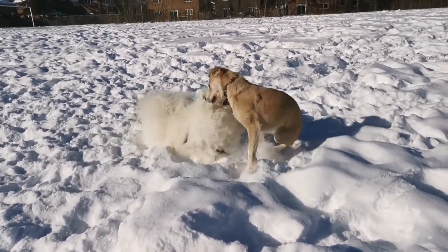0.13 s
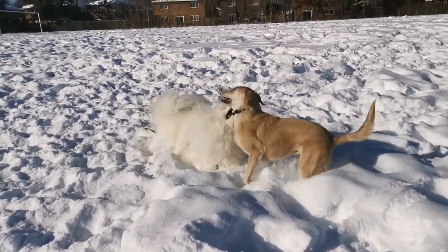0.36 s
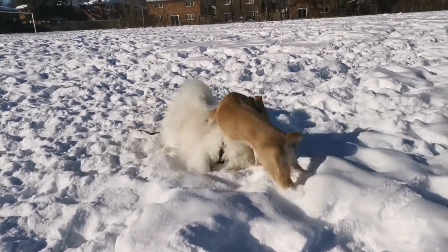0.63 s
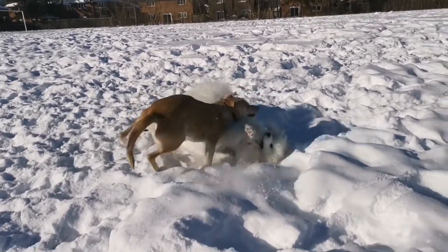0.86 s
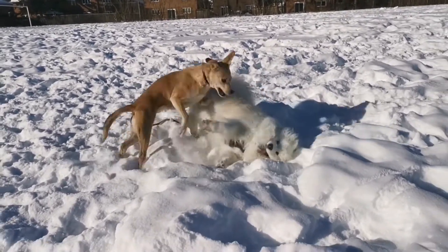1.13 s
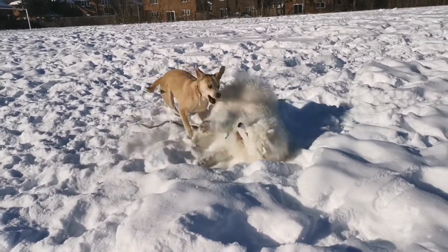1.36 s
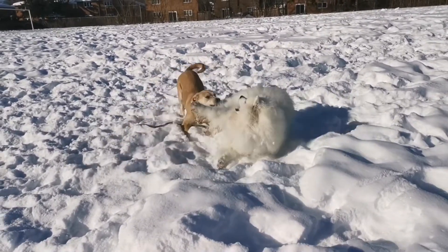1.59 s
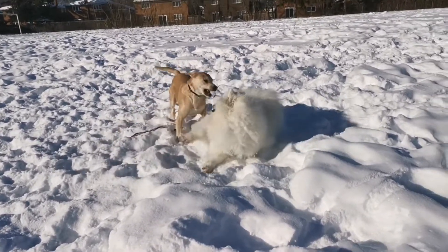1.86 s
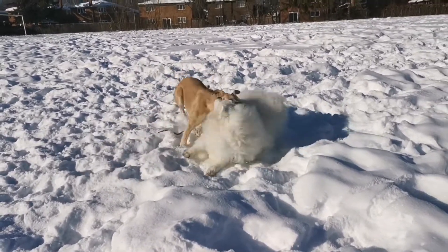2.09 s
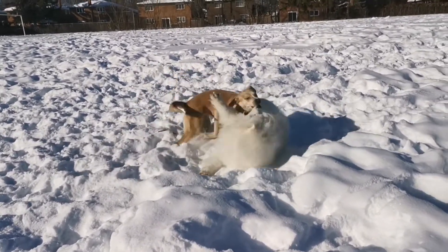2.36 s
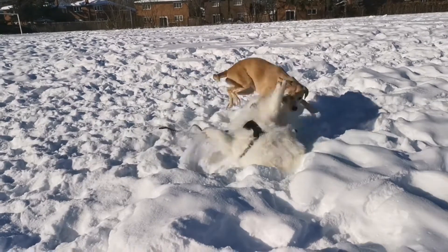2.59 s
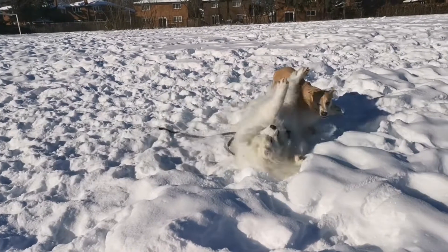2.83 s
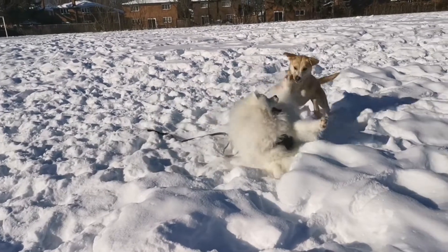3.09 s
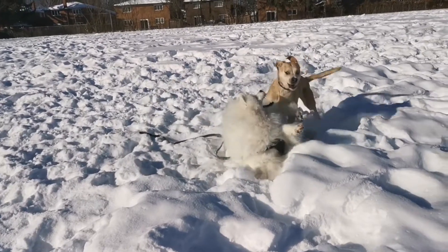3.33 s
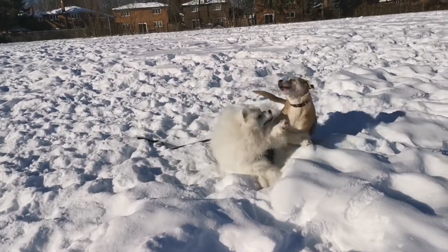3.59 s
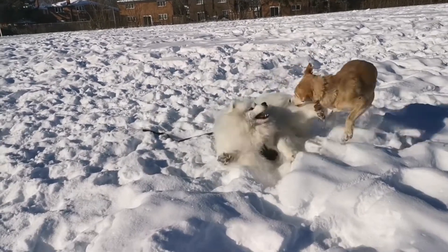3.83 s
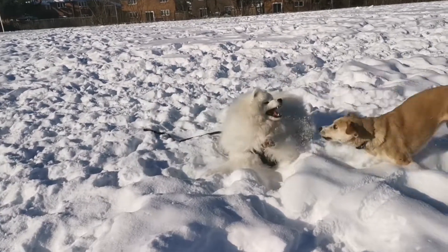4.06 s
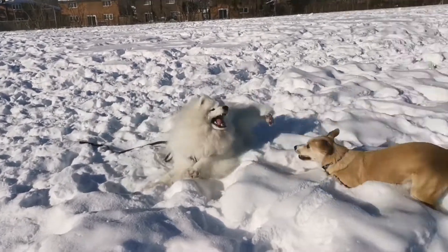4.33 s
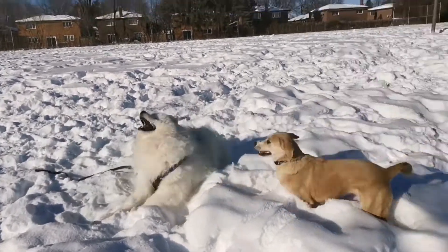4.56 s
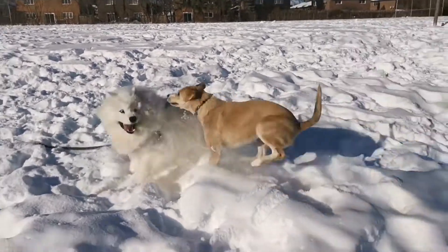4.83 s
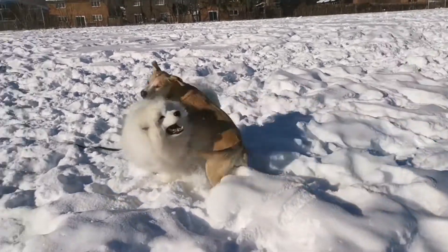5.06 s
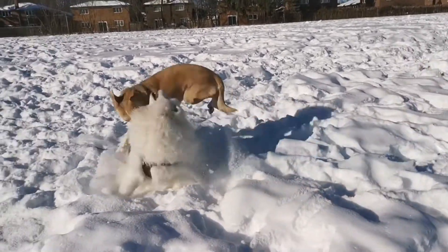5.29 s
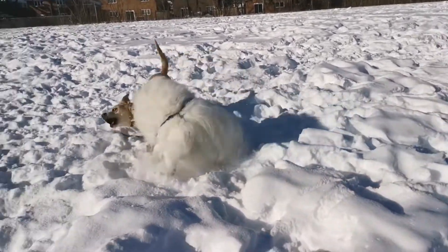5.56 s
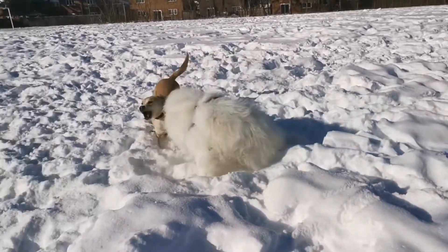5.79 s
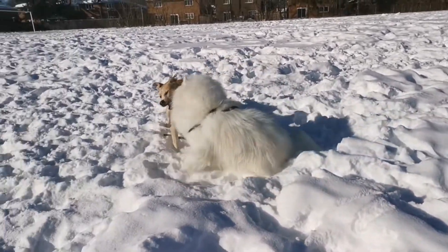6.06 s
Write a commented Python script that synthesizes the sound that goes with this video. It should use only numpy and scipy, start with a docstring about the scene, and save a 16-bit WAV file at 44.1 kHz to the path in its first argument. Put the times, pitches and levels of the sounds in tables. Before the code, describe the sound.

Outdoors on a snowy field, a small stereo microphone a few metres away catches dogs wrestling over a very faint, low rumbling breeze. From 0 to 1.2 s snow crunches and is shoved in dull lumps, with paw thumps at 0.3, 0.7 to 0.8 and 1.1 s, a tiny whine at 0.7 s and two quick pants around 1 s, then a faint breathy squeak. A low, throaty growl runs 1.3 to 1.8 s, briefly choked. After a lull, a stronger growl at 2.2 to 3.0 s rises, drops and throbs amid crunches and bright snaps. Soft pants follow. The third growl, 3.5 to 4.3 s, is forceful and jolting, with a sharp snap at 3.8 s and heavy crunching. Thuds cluster at 4.4 to 5.1 s between pants. A final raspy growl, 5.4 to 6.0 s, breaks into deep flutter, ending with a mouth-opening breath and a small crunch.

```python
"""Snow crunches and thumps under a light, rumbling breeze as two dogs wrestle and pant, with four growls
in between. Growls: uneven fold pulses and turbulent air ring chest, throat and mouth. Whine: a wavering sine.
Snow: clumped ice grains, dull clods and damped knocks. Breaths: noise through open-mouth resonances.
Breeze and air: lumpy filtered noise. A small stereo microphone a few metres off colours each port."""
import sys
import numpy as np
from scipy import signal
from scipy.fft import rfft, irfft
from scipy.io import wavfile
from scipy.ndimage import uniform_filter1d

SR = 44100
rng = np.random.default_rng(int(sys.argv[2]) if len(sys.argv) > 2 else 0)


def materialize(psi):
    """Save the field psi as 16-bit PCM at rate SR to the path in sys.argv[1].

    A 1-D psi becomes a single channel; in a 2-D psi each row is a channel.
    """
    bounded = np.clip(np.atleast_2d(psi).T, -1, 1)
    quanta = np.round(bounded * 32767).astype(np.int16)
    wavfile.write(sys.argv[1], SR, quanta)


def voltage_ratio(level):
    """Linear amplitude factor for a level in decibels (scalar or array-like)."""
    return 10 ** (np.asarray(level, float) / 20)


N = 272097  # samples

# air of the field, spectrum shape: hz, density_db_per_hz
AIR_SPECTRUM = [(12, -40), (20, 2), (66, -5), (165, -10), (250, -11.5), (412, -21), (1060, -21.5),
                (15200, -55)]
AIR_DB, BREEZE_DB = -59, -61.5

# fur and bodies shoving in the snow: peak_s, peak_db, build_up_s, dying_s
SCUFFLES = [(.626, -45, 0.38, 0.014), (.702, -60.5, .035, 0.74), (1.11, -48, 0.31, 0.046),
            (3.4, -56, 0.24, 0.035), (4.46, -45, 0.21, 0.33), (4.716, -42, 0.36, 0.0092),
            (5.036, -52.5, 0.18, 0.021), (5.3, -55, 1, 0.87)]
# packed snow under bodies, spectrum shape: hz, density_db_per_hz
BODY_SPECTRUM = [(40, -42), (70, 7.5), (250, 0.5), (700, -3.5), (1100, -13.5), (3500, -43)]
# paws and bodies crushing the snow: peak_s, peak_db (before crunch trim), build_up_s, dying_s
CRUNCHES = [(.1, -55, 0.043, 0.54), (.27, -48, 0.03, 0.07), (.33, -45, 0.07, 0.16),
            (.55, -40.5, 0.18, 0.095), (.76, -53, 0.15, 0.073), (.9, -52, 0.1, 0.17),
            (1.0, -51.5, 0.13, 0.26), (1.22, -55.5, 0.04, 0.067), (1.48, -41, 0.076, 0.063),
            (2.34, -39.5, 0.092, 0.29), (2.49, -42, 0.1, 0.08), (2.71, -42, 0.024, 0.16),
            (2.86, -46.5, 0.064, 0.16), (2.94, -42.5, 0.078, 0.2), (3.02, -44, 0.19, 0.025),
            (3.38, -58, 0.34, 0.079), (3.54, -53, 0.17, 0.26), (3.66, -40.5, 0.2, 0.058),
            (3.8, -39.5, 0.14, 0.073), (3.9, -45, 0.02, 0.037), (3.99, -44, 0.041, 0.15),
            (4.14, -37, 0.049, 0.35), (4.31, -46, 0.45, 0.076), (4.55, -46.5, 0.18, 0.66),
            (4.69, -52.5, 0.26, 0.14), (4.81, -55, 0.038, 0.032), (5.02, -43.5, 0.13, 0.032),
            (6.14, -46.5, 0.02, 0.038)]
# faint hiss of snow between crunches: s, level_db (before crunch trim)
SIFT_LEVEL = [(0.0, -53), (.22, -60), (.7, -58.5), (1.4, -60.5), (2.18, -70), (3.44, -78.5), (5.0, -59),
              (5.1, -56), (5.81, -54.5), (6.17, -67)]
# crushed snow, spectrum shape: hz, density_db_per_hz
SNOW_SPECTRUM = [(200, -2), (2500, -9), (4300, -11.5), (4900, -9.5), (7200, -8), (10000, -27), (15200, -36)]
BURST_SPAN_DB = 20  # fall from the peak over one build_up_s or dying_s
# paws landing: start_s, level_db, pitch_hz
THUMPS = [(0.257, -37, 305), (0.702, -37, 530), (0.752, -39.5, 150), (0.822, -39, 338), (1.075, -37.5, 166),
          (1.109, -37, 182), (4.369, -32, 279), (4.419, -29, 363), (4.426, -29, 218), (4.596, -31, 248),
          (4.657, -32, 275), (4.707, -31, 252), (5.005, -34.5, 585), (5.019, -29, 485), (5.108, -42.5, 705)]
# crust snapping and teeth clacking: start_s, level_db, pitch_hz
SNAPS = [(.2874, -38.5, 6700), (.9815, -38, 4420), (2.49, -31.5, 6630), (2.572, -33, 7040),
         (3.788, -25.5, 2460), (3.794, -30, 2880), (3.804, -33.5, 5430), (3.895, -43.5, 6000),
         (4.805, -37, 7200), (.54, -38, 5530), (6.132, -51, 3970)]

# panting, a breathy squeak (1.195) and the mouth opening as the last growl ends (5.896):
# start_s, end_s, level_db, resonance_factor, resonance_glide_share, width_factor
BREATHS = [(0.964, 1.055, -54, 0.85, -0.055, 1.3), (1.073, 1.169, -52.5, 0.93, 0.077, 2.2),
           (1.195, 1.247, -61, 1.96, -0.09, 2), (3.083, 3.224, -59, 0.57, 0.27, 1.14),
           (3.328, 3.406, -54, 0.89, 0.089, 2), (4.577, 4.638, -51.5, 0.71, .05, 1.8),
           (4.852, 4.996, -50.5, 0.874, 0.061, 0.83), (5.213, 5.27, -58.5, 1.18, -.03, 1.5),
           (5.298, 5.424, -51.5, 0.79, 0.11, 1.6), (5.896, 5.938, -49.5, 1.12, 0.0017, 0.58)]
# open mouth, before the factors of each breath: resonance_hz, width_hz, relative_db
OPEN_MOUTH = [(1050, 270, -1), (1950, 200, 4), (2740, 320, 1), (3400, 450, -2), (4280, 230, -10)]
# faint whine: s, pitch_hz, mean_level_db
WHINE = [(.7, 534, -50), (.76, 620, -61), (.82, 656, -53.5), (.88, 590, -69)]

# one table a growl: s, fold_pitch_hz, effort_db, mouth_resonance_hz, upper_over_throat_db
GROWLS = [
    [(1.334, 62.6, -56, 905, 11), (1.36, 63.98, -46, 890, -6), (1.47, 81.7, -38, 765, -7.5),
     (1.54, 90.7, -38.5, 734, -13.5), (1.59, 124.9, -41.5, 636, -8.5), (1.654, 124.7, -39.5, 468, -12.5),
     (1.748, 85.5, -59.5, 775, 6.5), (1.82, 80.8, -78, 720, 4)],
    [(2.228, 85, -43, 633, -21), (2.236, 89.92, -34.5, 660, -21), (2.326, 126.3, -31, 738, -9.5),
     (2.384, 117.5, -35.5, 640, -12), (2.466, 165, -24.5, 590, -12), (2.542, 205.6, -24.5, 543, -12),
     (2.59, 131.9, -34.5, 505, -12), (2.664, 119.1, -42, 524, -18.5), (2.78, 136.1, -38, 516, -11.5),
     (2.87, 133.6, -34, 765, -5.5), (2.938, 111.2, -40, 615, 2.5), (3.0, 91, -78, 705, -8)],
    [(3.462, 77.55, -45.5, 550, -3), (3.48, 82.15, -30, 577, -11.5), (3.566, 111.6, -27, 715, -9.5),
     (3.65, 128.3, -28, 584, -10.5), (3.722, 163.3, -25, 540, -12), (3.82, 214.5, -29, 553, -14.5),
     (3.9, 166.6, -30.5, 510, -16.5), (3.958, 134.9, -38, 600, -13), (4.1, 139.5, -30, 556, -19),
     (4.17, 126.3, -32.5, 477, -27), (4.2, 97.1, -44.5, 530, -18), (4.28, 95, -58.5, 604, -12)],
    [(5.44, 91.6, -54.5, 756, -11), (5.48, 106.6, -44, 790, -10.5), (5.624, 140.9, -28.5, 748, -7.5),
     (5.73, 103.9, -25.5, 770, -9.5), (5.786, 111.6, -42.5, 794, -6.5), (5.902, 92, -35, 837, -7),
     (5.975, 85, -57.5, 1010, -1)],
]
# chest in each growl: level_db at usual effort, let_go_s, resonance_over_pitch at start, at end
CHEST_HABITS = [(-41.5, 1.698, 1.68, 0.92), (-38, 2.94, 1.26, 1.36), (-38, 4.23, 1.38, 1.256),
                (-39, 5.92, 1.15, 1.24)]
# slack fold of each growl: fold_cycles_per_flutter, then chest throb as (s, depth 0-2)
SLACK_FOLDS = [(2, (1.4, .2), (1.7, .5)), (3, (2.42, .15), (2.5, 1.6), (2.56, 1.6), (2.6, .05), (2.72, .1),
               (2.78, .9), (2.94, .6)), (3, (3.5, .6), (3.8, .8), (3.9, .85)), (2, (5.55, .2), (5.68, .5),
               (5.85, .3))]
# lips drawn back in each growl: opening_db at start, at end, high_rasp_offset_db,
# lip_resonance_hz at start, at end
BARED_TEETH = [(-3, -10, 2, 2770, 2100), (0, -4.5, 1.7, 2660, 2220), (-8, -9, 1.5, 2280, 2280),
               (-15.5, -6.5, 0.083, 2300, 2700)]
# tongue and lips, one table a growl: s, lower_upper_resonance_hz, higher_upper_resonance_hz
TONGUES = [
    [(1.33, 1180, 2420), (1.382, 1200, 2000), (1.415, 1760, 2390), (1.572, 1400, 1800), (1.65, 1170, 1380),
     (1.82, 1270, 1710)],
    [(2.22, 1580, 2060), (2.3, 1690, 2180), (2.55, 1254, 1965), (2.692, 1310, 1800), (2.78, 1300, 1720),
     (3.0, 1650, 2310)],
    [(3.45, 1610, 1950), (3.56, 1460, 1770), (3.63, 1520, 2100), (3.726, 1210, 1890), (3.76, 1750, 2120),
     (3.85, 1380, 2130), (3.926, 1397, 1820), (4.28, 1400, 2010)],
    [(5.44, 1780, 1920), (5.65, 1624, 2020), (5.74, 1710, 2040), (5.77, 1530, 1940), (5.806, 1360, 1800),
     (5.888, 1770, 1960), (5.93, 1950, 2590), (6.02, 1500, 2430)],
]
# chest response: hz, relative_db
CHEST_RESPONSE = [(40, -25), (75, 11.5), (130, 1), (250, 3), (300, -3.5), (370, -40)]
# pipes beside the mouth resonance: resonance_hz at half-open mouth, width_hz, relative_db, opening_power
THROAT_PIPES = [(414, 162, -6, 0.22), (966.5, 150, -11, 0.29)]
# air hissing past the teeth: resonance_hz, width_hz, relative_db
TEETH_RASP = [(3270, 1020, -15.5)]
# higher hiss, before the offset of each growl: resonance_hz, width_hz, relative_db
HIGH_RASP = (5000, 800, -15)
# lip resonance: width_hz, relative_db
LIP_RESONANCE = (470, -7.5)
# the growling voice jolts: start_s, step_db
JOLTS = [(1.415, 3.5), (1.451, 5), (2.289, 1), (2.457, 3.5), (3.584, 5), (3.625, 5.5), (3.707, 4.5),
         (5.581, -2), (5.798, 8.5)]
# a bite damps throat and mouth: start_s, end_s, change_db
JAWS_SHUT = (1.595, 1.628, -19)
# throat flutter over a growl: depth at start, depth at end (0-1)
FLUTTER_DEPTHS = (.1, .15)
# last growl breaks up into deep flutter: start_s, flutter_depth (0-1)
BREAK_UP = (5.77, .55)

USUAL_EFFORT_DB, USUAL_BRIGHT_DB = -41, -8
CHEST_RISE_S, CHEST_FALL_DB_PER_S, CHEST_DB_PER_EFFORT_DB = 0.038, 281, 0.05
CHEST_LOWEST_HZ = 85
MOUTH_DB_PER_BRIGHT_DB = 0.34  # a darker voice rings less in the mouth
HALF_OPEN_HZ = 600  # mouth resonance, half open
STRAIN_DB_PER_EFFORT_DB = 0.4  # a harder push makes the folds more uneven
ROUGH_BASE, ROUGH_PER_BRIGHT_DB = 0.74, 0.022  # a brighter, more open voice is rougher
JOLT_FADE_S = 0.031

# left-right likeness that sets the phase spread: hz, likeness
PORT_LIKENESS = [(60, 1), (180, 0.97), (550, 0.99), (1650, 0.95), (4970, 0.1), (15000, 0.61)]
# port colour: hz, left_minus_right_db
PORT_BALANCE = [(60, 1.5), (150, -1), (380, -1.0), (950, -3), (2380, -3), (5980, -7), (15000, 7.5)]
MIC_HZ, MIC_WIDTH_HZ, MIC_ADDED_DB = 7460, 2290, 0.5  # port cavities


def evened(x):
    """Scales to rms 1."""
    return x / np.sqrt(np.mean(abs(x) ** 2) + 1e-20)


def read(points, hz):
    """Reads a curve along log frequency."""
    f, value = np.transpose(points)
    return np.interp(np.log(hz + 1), np.log(f + 1), value)


def add(mix, start_s, sound):
    """Adds a sound in place, cut at the end of the mix."""
    part = mix[max(round(start_s * SR), 0):][:len(sound)]
    part += sound[:len(part)]


def resonate(x, hz, width_hz):
    """Steep resonance of gain 1: shifts hz down to zero, smooths twice, shifts back."""
    turn = np.exp(2j * np.pi * np.cumsum(hz * np.ones(len(x))) / SR)
    r = np.exp(-np.pi * width_hz / SR)
    smooth = signal.lfilter([(1 - r) ** 2], [1, -2 * r, r * r], x / turn + 1e-18)
    return 2 * (turn * smooth).real


def wander(n, seconds):
    """Smooth chance of rms 1."""
    span = max(round(seconds * SR), 1)
    return evened(uniform_filter1d(uniform_filter1d(rng.standard_normal(n), span), span))


def coloured(x, points):
    """Filters by a dB curve over frequency."""
    return irfft(rfft(x) * voltage_ratio(read(points, np.fft.rfftfreq(len(x), 1 / SR))), len(x))


def gain_curve(rows):
    """A dB curve as gain over the scene, -120 dB outside its span."""
    s, db = np.transpose(rows)
    return voltage_ratio(np.interp(np.arange(N) / SR, s, db, left=-120, right=-120))


def bursts(events):
    """Gain that swells to each peak and dies away, evenly in dB."""
    t = np.arange(N) / SR
    power = np.zeros(N)
    for peak_s, db, rise_s, fall_s in events:
        away = np.maximum((peak_s - t) / rise_s, (t - peak_s) / fall_s)
        power += voltage_ratio(db - BURST_SPAN_DB * away) ** 2
    return np.sqrt(power)


def breeze():
    """Wind at the ports: lumpy low rumble, unrelated left and right."""
    gusts = [resonate(rng.standard_normal(N), 27.7, 35) * voltage_ratio(1.6 * wander(N, 0.063)) for port in "LR"]
    return voltage_ratio(BREEZE_DB) * evened(np.array(gusts))


def field_air():
    """Mostly low noise of unsteady level, common to both ports."""
    noise = rng.standard_normal(N) * voltage_ratio(1.9 * wander(N, 0.012))
    return voltage_ratio(AIR_DB) * evened(coloured(noise, AIR_SPECTRUM))


def ice_grains(per_s, size_db):
    """Random impulses of either sign, exponential sizes in dB up to four times size_db."""
    size = voltage_ratio(size_db * np.minimum(rng.exponential(1, N), 4))
    return evened(size * (rng.random(N) < per_s / SR) * rng.choice([-1, 1], N))


def scuffle():
    """Dull lumps: packed snow giving way in soft clods under fur and bodies."""
    clods = ice_grains(250, 5.5) + 1.54 * rng.standard_normal(N)
    return evened(coloured(clods, BODY_SPECTRUM)) * bursts(SCUFFLES)


def crunch():
    """Dense ice grains clumped as the crust gives way; loose spray differs at the two ports."""
    crust = ice_grains(6000, 0.65) * voltage_ratio(2.7 * wander(N, 0.0035)) + 0.56 * rng.standard_normal(N)
    crust = coloured(crust, SNOW_SPECTRUM)
    effort = np.hypot(bursts(CRUNCHES), gain_curve(SIFT_LEVEL))
    spray_spectrum = SNOW_SPECTRUM + np.array([0, -9.0])  # 9 dB down
    spray = np.array([coloured(rng.standard_normal(N), spray_spectrum) for port in "LR"])
    gain = effort * voltage_ratio(-3.5) / np.std(crust)  # crust trimmed to 3.5 dB under effort
    return crust * gain, spray * gain


def knocks(events, cycles, puff):
    """Damped swings that fade by 1/e in the given cycles, each with a puff of noise."""
    out, t = np.zeros(N), np.arange(1500) / SR
    for start_s, db, hz in events:
        noise = rng.standard_normal(len(t))
        swing = np.sin(2 * np.pi * hz * t) + puff * evened(resonate(noise, hz, hz))
        attack = np.minimum(t * hz / (0.045 * cycles), 1)
        add(out, start_s, voltage_ratio(db) * swing * np.exp(-t * hz / cycles) * attack)
    return out


def breaths():
    """Pants, squeak and mouth opening: breath noise through gliding open-mouth resonances."""
    out = np.zeros(N)
    for start_s, end_s, level_db, mouth, glide, blur in BREATHS:
        n = round((end_s - start_s) * SR)
        air = rng.standard_normal(n) * voltage_ratio(2.0 * wander(n, 0.002))
        shift = mouth * np.linspace(1 - glide, 1 + glide, n)
        breath = sum(voltage_ratio(db) * evened(resonate(air, hz * shift, blur * width_hz))
                     for hz, width_hz, db in OPEN_MOUTH)
        add(out, start_s, voltage_ratio(level_db) * evened(breath) * signal.windows.tukey(n, 0.4))
    return out


def whine():
    """A thin nasal tone: a sine wavering in pitch and level."""
    s, hz, db = np.transpose(WHINE)
    t = np.arange(s[0], s[-1], 1 / SR)
    pitch_hz = np.interp(t, s, hz) * (1 + 0.012 * wander(len(t), 0.0094))
    tone = np.sin(2 * np.pi * np.cumsum(pitch_hz) / SR)
    gain = voltage_ratio(np.interp(t, s, db) + 1.5 * wander(len(t), 0.012))
    return s[0], gain * tone * signal.windows.tukey(len(t), 0.2)


def folds(pitch_hz, rough, strain, cycles_per_flutter):
    """Uneven closing pulses, turbulent puffs, and the slack fold swinging once in a few cycles."""
    n = len(pitch_hz)
    uneven = strain * rough ** 2
    turns = np.cumsum(pitch_hz * (1 + 0.15 * uneven * wander(n, 0.008))) / SR
    slow_rate = np.gradient(turns) / cycles_per_flutter * (1 + 0.8 * rough ** 2 * wander(n, 0.012))
    slow = np.cos(2 * np.pi * np.cumsum(slow_rate))
    cycle = turns.astype(int)
    strength = voltage_ratio(5.0 * np.tanh(0.8 * uneven * rng.standard_normal(n)[cycle]))  # one draw a cycle
    pulses = np.diff(cycle, prepend=0) * strength
    puffs = (15.0 + np.exp(-(turns % 1) / 0.5)) * rng.standard_normal(n)
    return pulses, evened(puffs * voltage_ratio(2.23 * wander(n, 0.0085))), slow


def chest_ring(source, t, resonance_hz):
    """The chest filters the throbbing folds, rings near their pitch and holds an even level."""
    chest = coloured(source, CHEST_RESPONSE)
    chest = 0.45 * chest + resonate(chest, np.maximum(CHEST_LOWEST_HZ, resonance_hz), 124)
    steady = chest / np.sqrt(abs(uniform_filter1d(chest ** 2, size=4000)) + 1e-12)
    return steady * np.minimum((t - t[0]) / CHEST_RISE_S, 1)


def throat_ring(drive, mouth_hz, bright_db):
    """The mouth resonance less the throat pipes, which follow the opening."""
    opening = mouth_hz / HALF_OPEN_HZ
    mouth_gain = voltage_ratio(MOUTH_DB_PER_BRIGHT_DB * (bright_db - USUAL_BRIGHT_DB))
    pipes = sum(voltage_ratio(db) * resonate(drive, hz * opening ** power, width_hz)
                for hz, width_hz, db, power in THROAT_PIPES)
    return mouth_gain * resonate(drive, mouth_hz, 236) - pipes


def upper_ring(drive, hiss, t, bared, tongue):
    """Tongue and lips shape upper resonances; bared teeth open the top ones and the rasp."""
    n = len(t)
    start_db, end_db, high_rasp_db, *lip_hz = bared
    opening = voltage_ratio(np.linspace(start_db, end_db, n))
    s, *columns = np.transpose(tongue)
    low_hz, high_hz = (np.interp(t, s, hz) * (1 + 0.04 * wander(n, 0.01)) for hz in columns)  # trembles
    lip_width_hz, lip_db = LIP_RESONANCE
    top = voltage_ratio(lip_db) * resonate(drive, np.linspace(*lip_hz, n), lip_width_hz)
    top -= resonate(drive, high_hz, 286)
    for hz, width_hz, db in TEETH_RASP + [HIGH_RASP + np.array([0, 0, high_rasp_db])]:
        top += voltage_ratio(db + 3.8 * wander(n, 0.0051)) * resonate(hiss, hz, width_hz)
    return resonate(drive, low_hz, 304) + opening * top


def bite_and_jolts(t):
    """Gain on throat and mouth: a drop as the jaws shut, fading steps at each jolt."""
    start_s, end_s, bite_db = JAWS_SHUT
    shut = uniform_filter1d(1.0 * (t > start_s) * (t < end_s), size=200)
    jolt_db = sum(db * (t > at_s) * np.exp(-abs(t - at_s) / JOLT_FADE_S) for at_s, db in JOLTS)
    return voltage_ratio(bite_db * shut + jolt_db)


def growl(rows, habit, slack, bared, tongue):
    """Fold pulses and turbulent air ring chest, throat and mouth; a slower flutter makes them throb."""
    s, *columns = np.transpose(rows)
    t = np.arange(s[0], s[-1], 1 / SR)
    n = len(t)
    pitch_hz, effort_db, mouth_hz, bright_db = (np.interp(t, s, column) for column in columns)
    chest_db, let_go_s, *over_pitch = habit
    cycles_per_flutter, *throb_rows = slack

    extra_effort_db = effort_db - USUAL_EFFORT_DB
    rough = np.clip(ROUGH_BASE + ROUGH_PER_BRIGHT_DB * bright_db, 0.22, 0.85)  # share of air
    strain = voltage_ratio(STRAIN_DB_PER_EFFORT_DB * extra_effort_db)
    pulses, puffs, slow = folds(pitch_hz, rough, strain, cycles_per_flutter)

    throb = 1 + np.interp(t, *np.transpose(throb_rows)) * slow
    chest_source = (pulses + 0.065 * strain * rough ** 2 * puffs) * throb
    chest = chest_ring(chest_source, t, np.linspace(*over_pitch, n) * pitch_hz)
    chest_db = chest_db + CHEST_DB_PER_EFFORT_DB * extra_effort_db
    chest_db = chest_db - CHEST_FALL_DB_PER_S * np.maximum(t - let_go_s, 0)

    break_s, break_depth = BREAK_UP
    flutter = 1 + np.where(t > break_s, break_depth, np.linspace(*FLUTTER_DEPTHS, n)) * slow
    # each fold pulse is spread into a short noisy burst
    burst = rng.standard_normal(300) * np.exp(-np.arange(300) / 25)
    spread_pulses = evened(signal.oaconvolve(pulses, burst)[:n])
    gain = bite_and_jolts(t)
    drive = gain * (np.sqrt(1 - rough) * spread_pulses + np.sqrt(rough) * puffs) * flutter
    # the teeth hear mostly air
    hiss = gain * (np.sqrt(0.15) * evened(pulses) + np.sqrt(0.85) * puffs * flutter)

    throat = throat_ring(drive, mouth_hz, bright_db)
    # the harder the push, the more the folds lead
    upper = upper_ring(drive + hiss / strain, hiss, t, bared, tongue)
    voice = voltage_ratio(chest_db) * chest
    voice += voltage_ratio(effort_db) * (evened(throat) + voltage_ratio(bright_db) * evened(upper))
    return s[0], coloured(voice * signal.windows.tukey(n, 0.02), [(6000, 1.0), (12000, -14.0)])


def ports(x):
    """Each port hears the field with its own colour and a slightly different phase."""
    hz = np.fft.rfftfreq(N, 1 / SR)
    spread = np.arccos(np.clip(read(PORT_LIKENESS, hz), -1, 1))
    chance = np.tanh(evened(uniform_filter1d(rng.standard_normal(len(hz)), 300)))
    half = voltage_ratio(read(PORT_BALANCE, hz) / 2) * np.exp(1j * spread * chance * 0.56)
    return irfft(rfft(x) * np.array([half, 1 / half]), N)


def scene():
    """Dogs, snow and air through the ports, with spray and breeze of each port's own."""
    dogs = breaths()
    add(dogs, *whine())
    for call in zip(GROWLS, CHEST_HABITS, SLACK_FOLDS, BARED_TEETH, TONGUES):
        add(dogs, *growl(*call))
    crust, spray = crunch()
    snow = crust + scuffle() + knocks(THUMPS, 1.0, 0.47) + knocks(SNAPS, 9.8, 0.13)
    return ports(dogs + snow + field_air()) + spray + breeze()


def roll_off(x):
    """The treble ends steeply here."""
    return signal.sosfilt(signal.butter(12, 15670, fs=SR, output="sos"), x)


def record(dry):
    """The port cavities resonate and lift the treble."""
    cavities = np.array([resonate(port, MIC_HZ, MIC_WIDTH_HZ) for port in dry])
    lifted = dry + voltage_ratio(MIC_ADDED_DB) * cavities
    return roll_off(lifted)


dry = scene()
out = record(dry)
materialize(out)
```